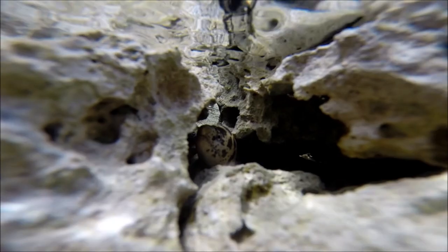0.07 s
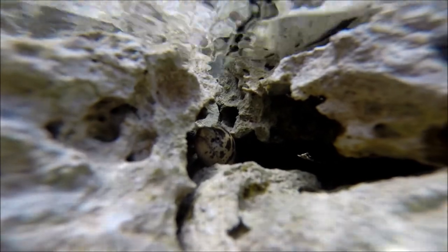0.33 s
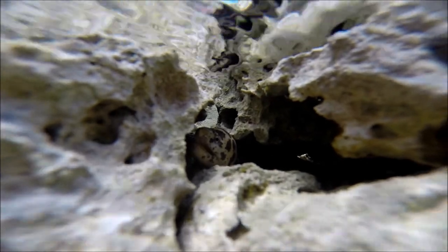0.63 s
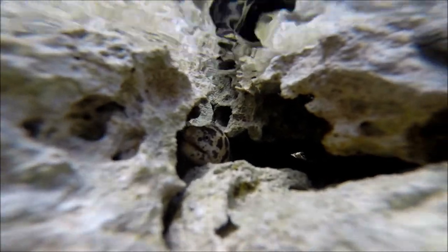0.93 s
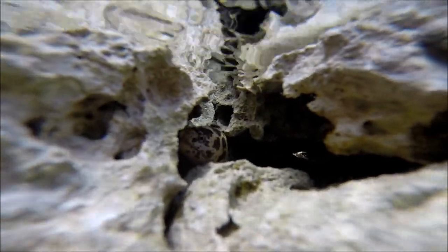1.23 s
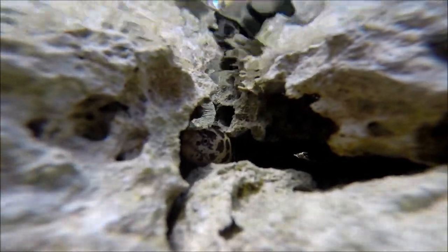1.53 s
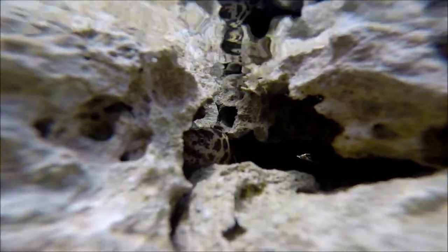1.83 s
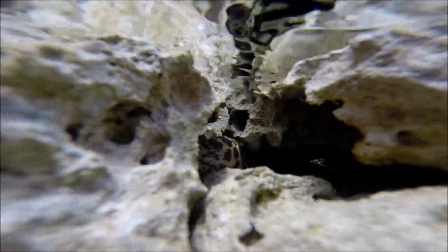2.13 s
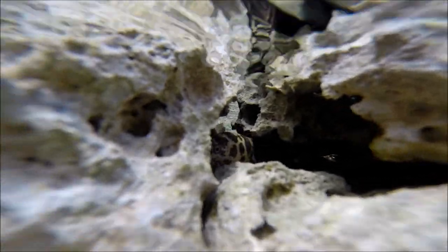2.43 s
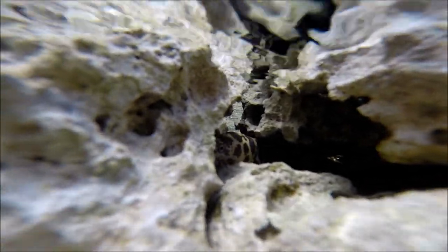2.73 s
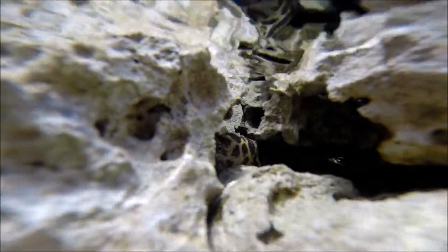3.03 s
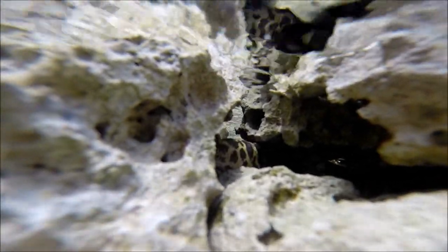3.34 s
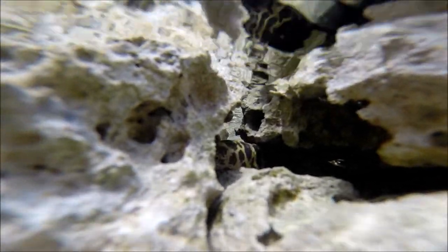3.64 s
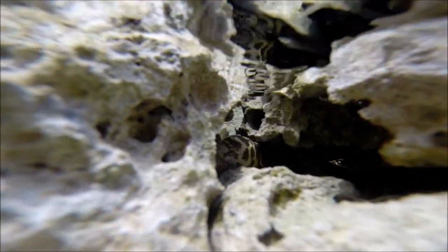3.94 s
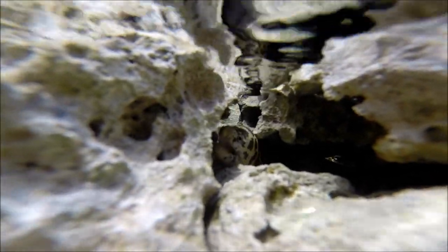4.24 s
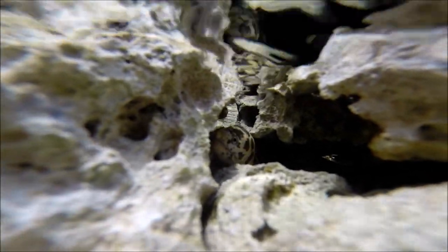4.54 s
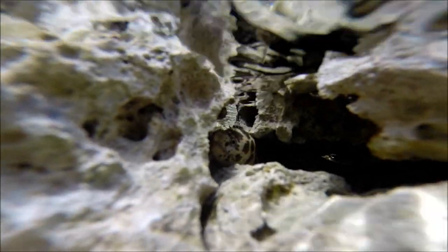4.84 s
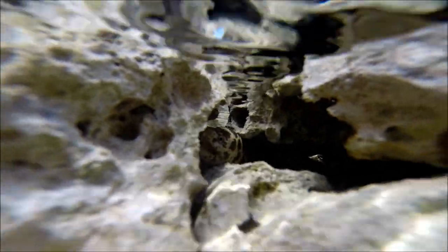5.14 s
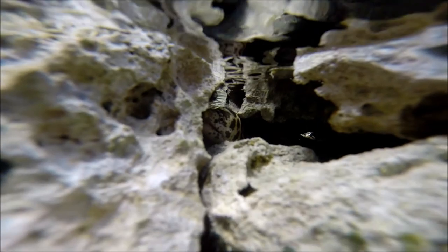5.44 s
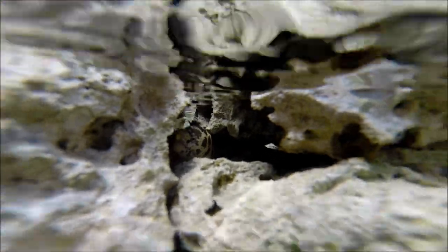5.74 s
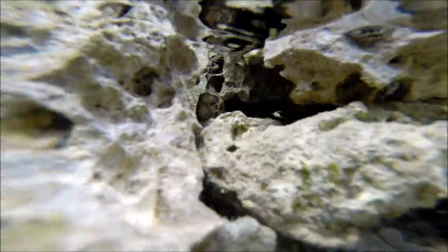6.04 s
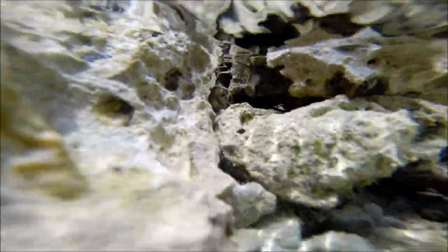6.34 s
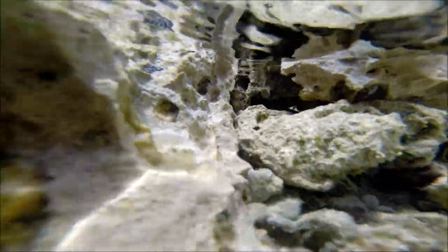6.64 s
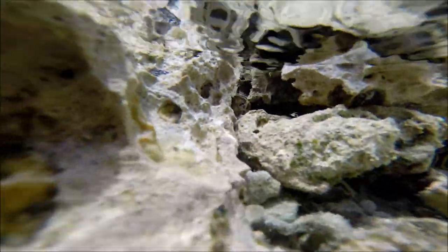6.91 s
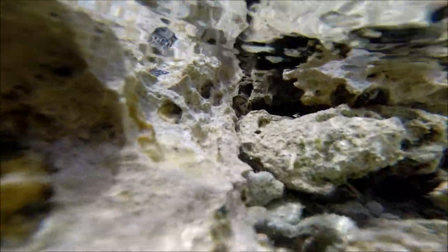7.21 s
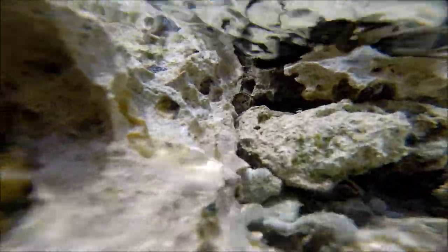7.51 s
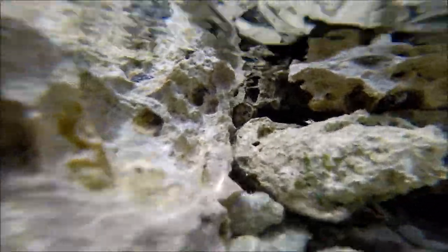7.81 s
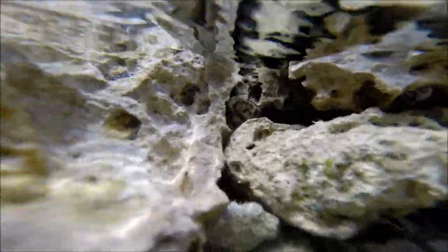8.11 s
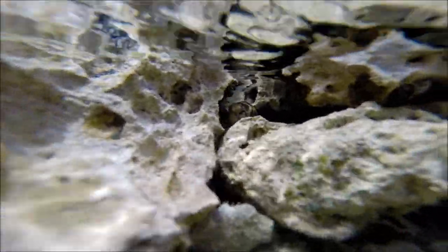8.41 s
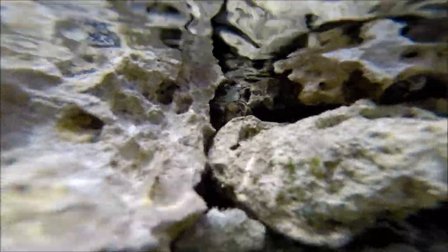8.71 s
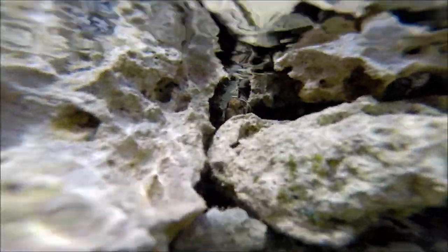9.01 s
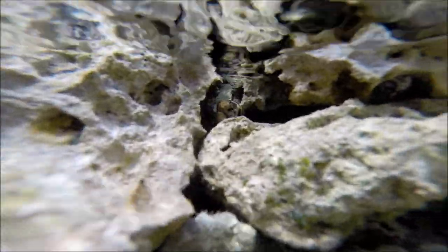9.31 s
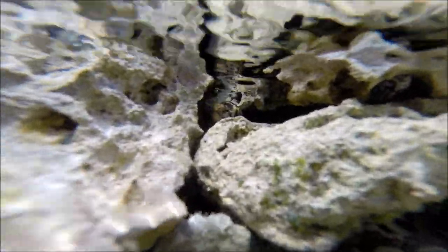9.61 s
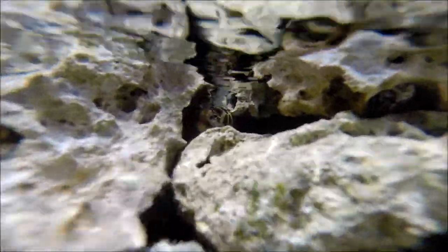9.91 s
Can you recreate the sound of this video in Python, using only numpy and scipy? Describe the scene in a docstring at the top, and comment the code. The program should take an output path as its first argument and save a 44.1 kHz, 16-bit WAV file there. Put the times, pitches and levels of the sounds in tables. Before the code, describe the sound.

Underwater in a shallow rock pool, heard from inside a hand-held waterproof camera. The case knocks dully and fingers creak and tick on it over a low rumble and gulp of water. Past the middle come harder knocks, sharp snaps in the water and jerky scrapes of the case on rock. Then it settles to the rumble, with a soft hiss and a faint, thin electronic whine that run throughout.

```python
"""A shallow rock pool, heard from under the surface by the microphone inside a hand-held waterproof camera.
Right at the microphone the case knocks dully, scrapes and drags on limestone, and creaks as fingers slip.
Sharp snaps cross the water and a few small bubbles ring. Behind them lie the rumble and gulp of hand and
water pushing on the case, a soft hiss with one wandering band, fine fizz and a thin electronic whine."""
import sys
import numpy as np
from scipy import signal
from scipy.fft import rfft, irfft
from scipy.io import wavfile
from scipy.ndimage import uniform_filter1d

SR = 44100
rng = np.random.default_rng(int(sys.argv[2]) if len(sys.argv) > 2 else 0)


def bounce(signal):
    """Save signal as a 16-bit WAV file at the path given by the first command-line argument."""
    frames = np.transpose(np.atleast_2d(signal))
    limited = np.clip(frames, -1, 1)
    pcm = np.round(limited * 32767).astype(np.int16)
    wavfile.write(sys.argv[1], SR, pcm)


N = 439236
T = np.arange(N) / SR

# harmonics of the electronic whine: multiple, relative_db
WHINE_HARMONICS = [(1, -75.5), (2, -71.5), (3, -82.5), (4, -74), (5, -88.5)]
# the whine recedes at the end: time_s, gain_db
WHINE_GAIN = [(0, 4), (7.6, 4), (9.96, -3.5)]
# spectrum of the hiss: frequency_hz, relative_db
HISS_COLOUR = [(100, 6), (350, 6), (600, 1.5), (1000, -1), (1900, -3.5), (2600, -3.5), (2950, -5.5),
               (3300, -10), (5200, -14), (7500, -18.5), (10000, -22.5), (13000, -24), (15000, -33)]
# the hiss swells once and recedes at the end: time_s, relative_db
HISS_LEVEL = [(0, -61.5), (4.9, -60.5), (5.3, -54.5), (5.7, -60), (7.6, -62), (8.5, -64.5), (9.96, -68.5)]
# fine fizz, high in the treble: time_s, level_db
FIZZ_LEVEL = [(0, -77.5), (4.1, -80.5), (5.1, -71), (5.2, -61.5), (5.5, -69), (5.6, -97)]
# the wandering band of noise: time_s, centre_hz, level_db
BAND_PATH = [(0, 1230, -74), (1.6, 1287, -69), (3.3, 1327, -63.5), (4, 1394, -58.5), (4.6, 1422, -57.5),
             (5.1, 1476, -57.5), (5.9, 1645, -62), (6.2, 1333, -57), (7.7, 1281, -64), (8.5, 1326, -61),
             (9.96, 1294, -70)]
# slow flow of water around the case: time_s, relative_db
FLOW_LEVEL = [(0, -38), (.6, -41), (1.5, -41.5), (2.2, -37), (3.4, -42), (4.9, -40), (5.4, -36), (6.6, -38),
              (8.1, -38), (8.9, -44), (9.35, -43.5), (9.6, -49), (9.96, -42)]
# pushes of the hand swell the rumble: peak_s, rise_db
HAND_PUSHES = [(.1, 7.5), (.85, 8.5), (2.5, 4.5), (4.3, 7.5), (5.47, 4.5), (6.02, 3.5), (6.33, 4.5),
               (6.97, 4), (8.71, 5)]
# spectrum of the handling rumble: frequency_hz, relative_db
RUMBLE_COLOUR = [(8, -1), (20, 0), (35, 0.5), (55, -5.5), (80, -9), (120, -21), (180, -27), (300, -39.5),
                 (600, -77.5)]
# spectrum of the gulping water: frequency_hz, relative_db
GULP_COLOUR = [(30, -17), (75, 1.5), (110, -0.5), (170, -7.5), (300, -21.5), (700, -55.5)]
# small bubbles and squeaks: start_s, pitch_hz, level_db, t60_s, glide_octaves_per_s
BUBBLES = [(2.566, 2380, -54, 0.3, 2), (3.361, 2390, -52, 0.17, -1.5), (4.721, 1750, -13.5, 0.0061, 8),
           (5.19, 9500, -47.5, 0.088, -23)]
# sharp snaps out in the water: start_s, peak_db, treble_db
SNAPS = [(0.923, -43.5, 23), (1.734, -33, 6), (5.935, -33.5, 25), (5.986, -38.5, 10), (6.031, -18, 16.5),
         (6.0592, -37, 5), (6.081, -9, 4), (6.182, -25, 4)]
# the ring of a snap: pitch_hz, width_hz, relative_db
SNAP_MODES = [(1476, 123, -3), (1920, 200, -3.5), (2430, 124, 6), (3180, 490, -7.5), (3520, 250, -9),
              (4300, 300, -16.5), (5900, 1000, -16.5), (7180, 240, -10.5), (7800, 630, -13),
              (10100, 2800, -21)]
# fingers slip on the case: start_s, length_s, relative_db, bass_db
FINGER_SLIPS = [(.078, .02, -53, 10), (0.335, 0.0066, -38.5, 20), (0.356, .017, -47.5, 11),
                (0.38, 0.006, -36, 9), (0.713, 0.0071, -40, 6), (0.724, .0065, -37.5, 3),
                (0.777, 0.034, -43, 6.5), (0.879, 0.015, -48.5, 8), (1.1977, .0039, -28, 0),
                (1.413, 0.009, -49, -13), (2.076, .02, -47, -5), (2.096, 0.013, -34.5, 1),
                (2.175, 0.028, -43, 5), (2.2027, 0.0019, -29.5, 12), (2.263, 0.003, -38.5, 4),
                (2.286, 0.0049, -36.5, 11), (2.355, .006, -47.5, 9), (2.415, .016, -50, 5),
                (2.505, 0.014, -38, 11), (2.807, .012, -51.5, 0), (2.89, .0032, -30, 1),
                (2.897, .0038, -29.5, 4), (2.903, .0055, -30, 2.5), (2.915, .0053, -28.5, -3),
                (2.979, 0.029, -51.5, -12), (3.044, .002, -34, 4), (3.05, .0072, -40, -15),
                (3.561, 0.0041, -47, -9), (3.642, 0.0034, -41.5, 25), (4.064, .018, -50, 13),
                (4.115, 0.0057, -41, -1), (4.34, 0.0038, -35.5, -14), (4.55, .003, -49, 0),
                (5.031, 0.033, -48, 10), (5.14, 0.047, -42, 11), (5.298, 0.079, -48, 19),
                (5.393, 0.09, -44, 15)]
# spectrum of a finger slip: frequency_hz, relative_db
GRIP_COLOUR = [(100, -18.5), (300, -6), (550, -18.5), (1000, -1.5), (1500, -6), (2000, 4), (2400, 4.5),
               (2900, -2), (3300, -14.5), (4600, -15), (5500, -21), (6700, -17), (9000, -26), (15000, -38)]
# the ring of the case around the microphone: pitch_hz, width_hz, relative_db
CASE_MODES = [(316, 234, -1.5), (692, 150, -1.5), (1208, 280, 1.5), (1655, 330, -3), (2048, 137, -2.5),
              (2492, 110, 3), (2896, 370, -9), (3730, 300, -12), (4450, 280, -13), (4650, 420, -15.5),
              (5600, 245, -14), (6680, 390, -16.5), (8450, 260, -21), (10000, 1300, -34.5),
              (12440, 1200, -35.5), (14200, 1600, -38.5)]
# the case catches on a point of rock: start_s, length_s, relative_db, bass_db, treble_db
ROCK_SCRAPES = [(5.165, .0025, -32.5, 2, -8), (5.285, 0.014, -29.5, 13.5, 6),
                (5.289, 0.0062, -26.5, -15, -2), (5.4165, .003, -37.5, -14, 6),
                (5.483, 0.0032, -19.5, 12, -0.5), (5.496, 0.0038, -31, 4, 4),
                (5.538, 0.0036, -40.5, -16, -18), (6.163, 0.0019, -37, 0, 7),
                (6.2645, .012, -29.5, -9, 1.5), (6.304, .02, -23.5, -8, -2), (6.349, .003, -39, 4, -3),
                (6.898, 0.0059, -40.5, 0, 8), (6.909, 0.0042, -43, -8, 8), (6.9205, 0.0042, -17, -9, 10),
                (6.96, 0.0015, -9.5, -6, 7.5), (6.983, 0.005, -21.5, -0.5, -2),
                (6.999, 0.0058, -25.5, -14, 6), (7.258, 0.0039, -26, 5, 5), (7.272, .018, -30, -1.5, -13),
                (7.3045, 0.0046, -24, 7, -14), (7.354, 0.0029, -50, 4, 17), (7.379, 0.0092, -42, -13, 14.5)]
# the case drags until the rock lets go: start_s, length_s, final_db, swell_db, release_s_per_20_db, treble_db
ROCK_DRAGS = [(6.206, .113, -23, 21.5, .015, 5), (6.916, 0.035, -21, -1.5, 0.04, 3.5),
              (6.98, .025, -26, 0.5, 0, -1), (7.008, .02, -45, -5, 0.1, 7),
              (7.094, .018, -40.5, 10, .02, -4), (7.159, 0.12, -31.5, 21.5, 0.06, 4),
              (7.309, 0.1, -50.5, 7, 1.1, 6), (7.471, 0.08, -31, 15.5, 0.1248, 2.5)]
# tone of a drag over rock: frequency_hz, gain_db
DRAG_COLOUR = [(250, 3), (700, -1), (1200, -.5), (2600, 0), (4100, 2.5), (5600, -0.5), (10000, 1)]
# dull knocks on the case: start_s, pitch_hz, level_db, t60_s, hardness (0-1)
CASE_KNOCKS = [(.016, 113, -16.5, 0.052, 0.1), (0.109, 112, -20.5, 0.059, .03),
               (.379, 169, -12.5, 0.063, 0.08), (.724, 112, -16.5, 0.046, 0.07),
               (1.1977, 182, 2, 0.017, 0.18), (1.205, 64, -4, 0.027, .04), (1.3, 90, -22, 0.045, 0.36),
               (2.904, 170, -16, 0.023, 0.09), (5.288, 106, -4, 0.034, .52), (5.398, 74, -13, .04, 0.06),
               (5.4833, 153.4, -4, .13, 0.46), (5.5384, 116, -8.5, .11, 0.49), (6.946, 90, -11, .07, .05),
               (6.9664, 118, -8.5, 0.11, 0.07), (7.0063, 128, -6, .037, 0.05),
               (7.884, 71.5, -11.5, 0.014, 0.39), (8.695, 223, -27, 0.013, .14)]

WHINE_HZ, FRAME_HZ = 2926.5, 29.972
PUSH_S = 0.086  # time a push takes to build, and again to ease
SLIP_HZ, SLIP_JITTER, SLIP_DEPTH_DB = 128, .3, 9  # a dragged case jerks forward and sticks again
JUDDER_HZ, JUDDER_WIDTH_HZ, JUDDER_DB, JUDDER_LAG_S = 100, 70, -1, .008  # its shaking, against its scrape


def undb(db):
    """Decibels to gain."""
    return 10 ** (np.asarray(db) / 20)


def unit(x):
    """Scale to rms 1."""
    return x / np.sqrt(np.mean(x ** 2))


def curves(table):
    """Each column after the first as a line through time."""
    times_s, *columns = np.transpose(table)
    return [np.interp(T, times_s, column) for column in columns]


def add(out, start_s, x):
    """Mix a sound in at its start time."""
    i = max(int(start_s * SR), 0)
    out[i:i + len(x)] += x[:max(N - i, 0)]


def colour(x, points, size=4096):
    """Causal filter through (frequency_hz, gain_db) points, built from the cepstrum of its gain."""
    hz, db = np.transpose(points)
    bins_hz = np.maximum(np.arange(size // 2 + 1) * SR / size, 1)
    gain = undb(np.interp(np.log(bins_hz), np.log(hz), db))
    cepstrum = irfft(np.log(gain))
    cepstrum[1:size // 2] *= 2
    cepstrum[size // 2 + 1:] = 0
    return signal.fftconvolve(x, irfft(np.exp(rfft(cepstrum))))[:len(x)]


def ring(modes, size=1024):
    """Response of damped modes to one click; neighbours swing in opposite senses."""
    t = T[:size]
    return sum((-1) ** k * undb(db) * width * np.exp(-np.pi * width * t) * np.sin(2 * np.pi * hz * t)
               for k, (hz, width, db) in enumerate(modes))


def walk(rate_hz):
    """Random steps smoothed twice into a wander of rms 1."""
    hold = int(SR / rate_hz)
    steps = rng.standard_normal(4096)[np.arange(N) // hold]
    return unit(uniform_filter1d(uniform_filter1d(steps, hold), hold))


def narrow_noise(centre_hz, width_hz):
    """Noise in a narrow resonance whose centre may move."""
    lowpass = signal.butter(2, width_hz / 2, fs=SR, output="sos")
    slow = signal.sosfilt(lowpass, rng.standard_normal((2, N)))
    phase = 2 * np.pi * np.cumsum(centre_hz * np.ones(N)) / SR
    return unit(slow[0] * np.cos(phase) + slow[1] * np.sin(phase))


def electronics():
    """Beside the microphone the picture readout whines; it restarts each frame, giving a slight buzz."""
    phase = 2 * np.pi * WHINE_HZ * (T % (1 / FRAME_HZ))
    gain_db, = curves(WHINE_GAIN)
    whine = sum(undb(db) * np.sin(multiple * phase) for multiple, db in WHINE_HARMONICS)
    return undb(gain_db + 1.8 * walk(5.4)) * whine


def hiss():
    """The backdrop: a soft hiss, a flickering fizz above it and one band that wanders in pitch."""
    hiss_db, = curves(HISS_LEVEL)
    fizz_db, = curves(FIZZ_LEVEL)
    band_hz, band_db = curves(BAND_PATH)
    soft = unit(colour(rng.standard_normal(N), HISS_COLOUR)) * undb(hiss_db + .5 * walk(7.1) + 6.5)
    fizz = narrow_noise(12000, width_hz=6500) * undb(fizz_db + 4.1 * walk(60))
    band = narrow_noise(band_hz, width_hz=214) * undb(band_db + 2.2 * walk(12))
    return soft + fizz + band


def water(rumble_gain_db=3, gulp_gain_db=-10):
    """Hand and water push slowly on the case, and the water gulps around it in uneven surges."""
    flow_db, = curves(FLOW_LEVEL)
    motion_db = flow_db + sum(db * np.exp(-((T - peak_s) / PUSH_S) ** 2) for peak_s, db in HAND_PUSHES)
    rumble = unit(colour(rng.standard_normal(N), RUMBLE_COLOUR, size=16384))
    rumble *= undb(rumble_gain_db + walk(14))
    surge = undb(3.5 * walk(28))
    gulps = unit(colour(rng.standard_normal(N), GULP_COLOUR) * surge) * undb(gulp_gain_db)
    return (rumble + gulps) * undb(motion_db)


def bubbles(rise_s=0.002):
    """Each bubble rings at a pitch that slides as it moves."""
    out, t = np.zeros(N), T[:SR // 4]
    for start_s, hz, db, t60_s, glide in BUBBLES:
        phase = 2 * np.pi * np.cumsum(hz * 2 ** (glide * t)) / SR
        envelope = np.exp(-np.log(1000) * t / t60_s) * (1 - np.exp(-t / rise_s))
        add(out, start_s, undb(db) * np.sin(phase) * envelope)
    return out


def snaps():
    """Single sharp clicks cross the water and ring for a few milliseconds."""
    out = np.zeros(N)
    for start_s, peak_db, treble_db in SNAPS:
        snap = colour(ring(SNAP_MODES), [(2600, 0), (11000, treble_db)], size=512)
        add(out, start_s, undb(peak_db) * snap / np.abs(snap).max())
    return out


def friction(size, rate_hz, grit, spread_db=5):
    """Stick and slip: uneven clicks over fine grit."""
    chance, strength, fine = rng.random(size), rng.standard_normal(size), rng.standard_normal(size)
    clicks = (chance < rate_hz / SR) * undb(spread_db * np.minimum(strength, 2)) * np.sign(fine)
    # the pressure catches and lets go every few milliseconds
    catch = undb(3.5 * unit(uniform_filter1d(rng.standard_normal(size), size=130)))
    return (clicks + grit * fine) * catch


def strokes(table, body, rate_hz, grit, fade, size=8192):
    """Strokes of friction ring a body, at a new spot each time; each has its own bass and treble."""
    out, t = np.zeros(N), T[:size]
    for start_s, length_s, db, bass_db, treble_db in table:
        swell = 1 - np.exp(-t / (3 * length_s ** 2))
        force = swell * np.exp(-fade * t / length_s) / (1 + (t / length_s) ** 8)
        slips = friction(size, rate_hz, grit) * force
        slips[0] = 3 * np.exp(-length_s / .008)  # a short stroke starts with a snap
        stroke = signal.fftconvolve(slips, body())
        stroke = colour(stroke, [(450, bass_db), (1200, 0), (2600, 0), (5000, treble_db)], size=512)
        add(out, start_s, stroke * undb(db) * np.sqrt(length_s * SR / np.sum(stroke ** 2)))
    return out


def held_case():
    """Under a finger the case gives a hollow tick with a brief, scattered ring."""
    t = T[:512]
    scatter = .07 * rng.standard_normal(len(t)) * np.exp(-t / .0016)
    return colour((t == 0) + scatter, GRIP_COLOUR)


def faint_slips(count=16, until_s=4.6, length_s=.012, relative_db=-56, spread_db=4.5, bass_db=3):
    """The grip ticks faintly at random moments: more rows like those of FINGER_SLIPS."""
    return [(until_s * (k + when) / count, length_s * (.5 + stretch),
             relative_db + spread_db * (2 * strength - 1), bass_db)
            for k, (when, stretch, strength) in enumerate(rng.random((count, 3)))]


def grip(gain_db=1, treble_db=2):
    """Skin slips on the case, close to the microphone, in short, damped creaks and faint ticks."""
    table = [(*row, treble_db) for row in FINGER_SLIPS + faint_slips()]
    return undb(gain_db) * strokes(table, held_case, rate_hz=900, grit=.096, fade=.45)


def struck_case():
    """The spot that is struck shifts the balance and the pitch of the modes a little."""
    modes = np.array(CASE_MODES, dtype=float)
    modes[:, 0] *= 1 + .018 * rng.standard_normal(len(modes))
    modes[:, 2] += 1.5 * rng.standard_normal(len(modes))
    return ring(modes)


def scrapes(gain_db=1.5):
    """Rough limestone plucks the modes of the case."""
    return undb(gain_db) * strokes(ROCK_SCRAPES, struck_case, rate_hz=1100, grit=.06, fade=.192)


def drags(bite_s=.0046, rock_points=2, size=16384):
    """A drag builds in quick jerks and dies away; points of rock ring the case, and the camera judders."""
    out, pressure, t = np.zeros(N), np.zeros(N), T[:size]
    for start_s, length_s, final_db, swell_db, release_s, treble_db in ROCK_DRAGS:
        shape_db = np.where(t < length_s, swell_db * (t / length_s - 1), -20 * (t - length_s) / release_s)
        force = undb(final_db + shape_db) * (1 - np.exp(-(t / bite_s) ** 2))
        slip_hz = SLIP_HZ * (1 + SLIP_JITTER * walk(90)[:size])
        cycle = np.cumsum(slip_hz) / SR % 1
        jerks = force * undb(-SLIP_DEPTH_DB * cycle)
        drag = sum(signal.fftconvolve(friction(size, rate_hz=900, grit=.058) * jerks, struck_case())
                   for _ in range(rock_points))
        drag = colour(drag, DRAG_COLOUR, size=512)
        drag = colour(drag, [(2600, 0), (5000, treble_db)], size=512)
        add(out, start_s, drag * np.sqrt(np.sum(force ** 2) / np.sum(drag ** 2)))
        add(pressure, start_s + JUDDER_LAG_S, force)
    judder = undb(JUDDER_DB) * pressure * narrow_noise(JUDDER_HZ, JUDDER_WIDTH_HZ)
    return out + judder


def knocks():
    """The case bounces in the water; a hard knock starts fast, its pointed crests rounding as it fades."""
    out, t = np.zeros(N), T[:SR // 4]
    for start_s, hz, db, t60_s, hardness in CASE_KNOCKS:
        swing = -1j * np.exp((2j * np.pi * hz - np.log(1000) / t60_s) * t)
        pointed = np.real(swing / (1 - hardness * swing))
        rise_s = .00012 / hardness
        attack = 1 - np.exp(-(t / rise_s) ** 2)
        add(out, start_s, undb(db) * pointed * attack)
    return out


def scene():
    """Everything that reaches the one microphone inside the case."""
    on_the_case = knocks() + scrapes() + drags() + grip()
    in_the_pool = snaps() + bubbles() + water()
    return (on_the_case + in_the_pool + hiss() + electronics())[None]


def record(dry, top_hz=15400):
    """The recorder holds peaks at full scale and cuts the top."""
    lowpass = signal.ellip(8, .2, 70, top_hz, fs=SR, output="sos")
    return signal.sosfilt(lowpass, np.clip(dry, -1, 1))


dry = scene()
out = record(dry)
bounce(out)
```